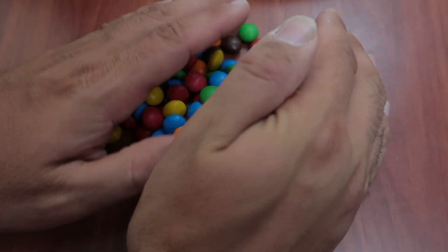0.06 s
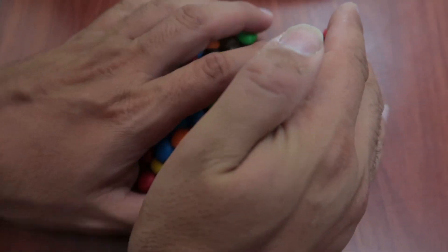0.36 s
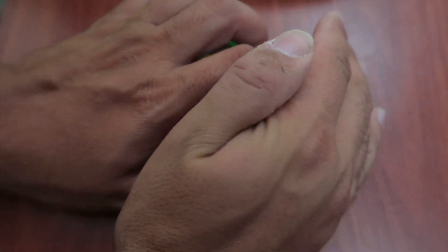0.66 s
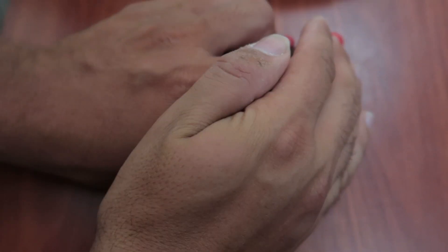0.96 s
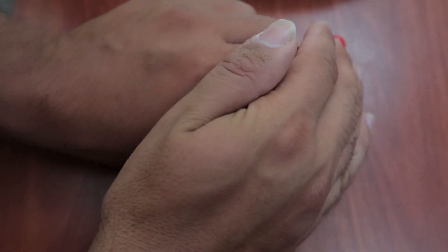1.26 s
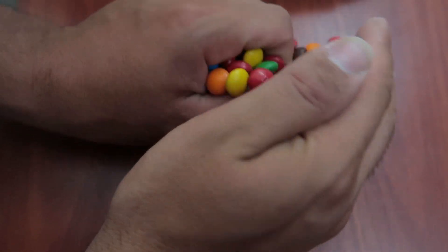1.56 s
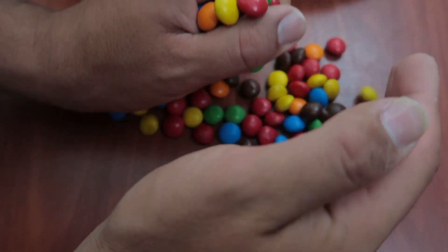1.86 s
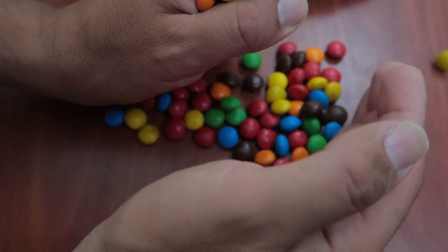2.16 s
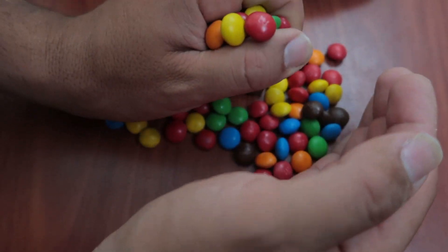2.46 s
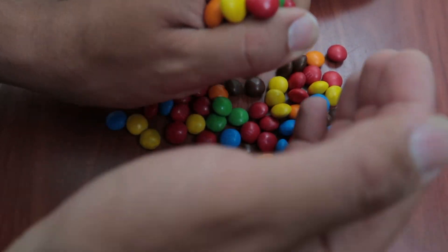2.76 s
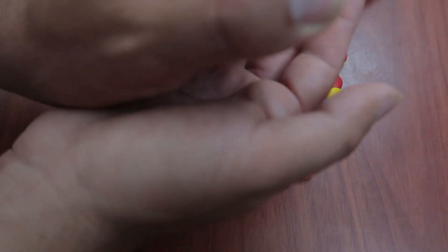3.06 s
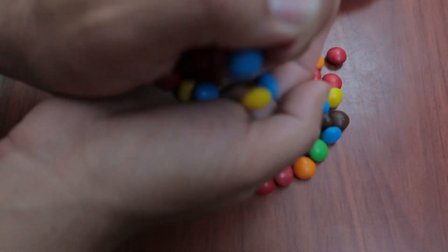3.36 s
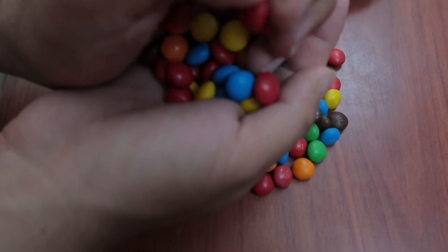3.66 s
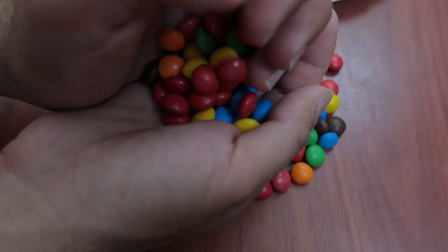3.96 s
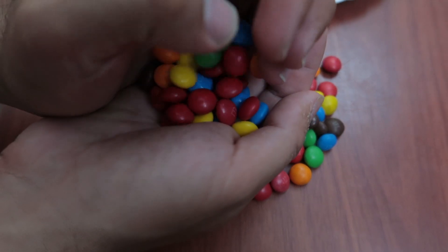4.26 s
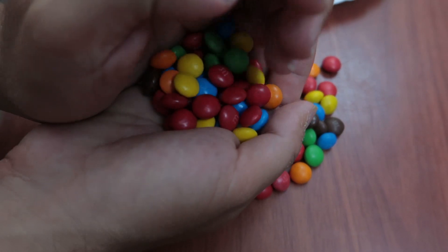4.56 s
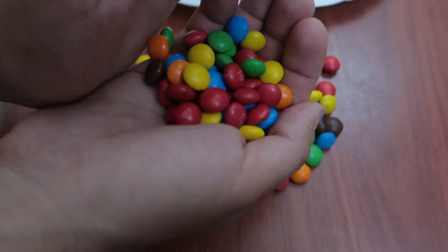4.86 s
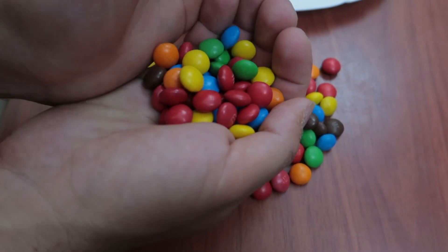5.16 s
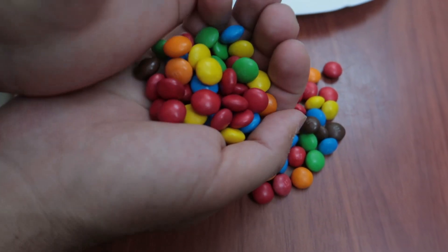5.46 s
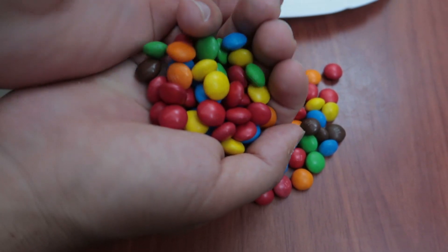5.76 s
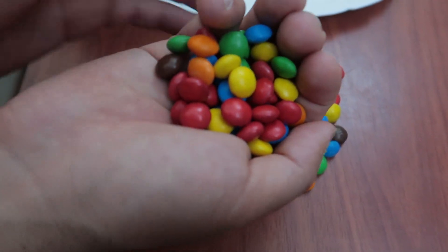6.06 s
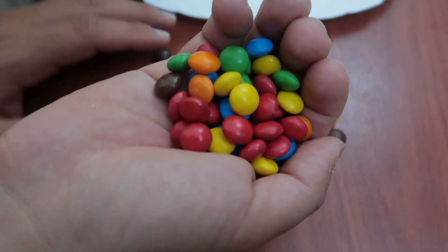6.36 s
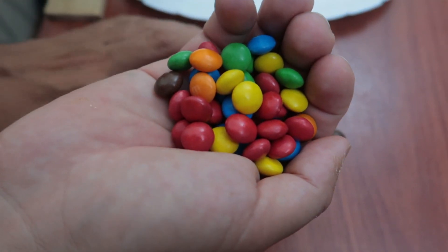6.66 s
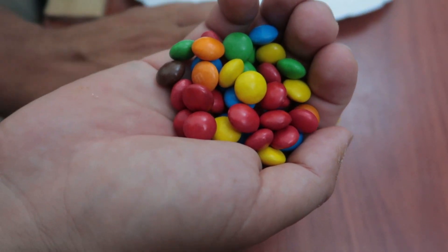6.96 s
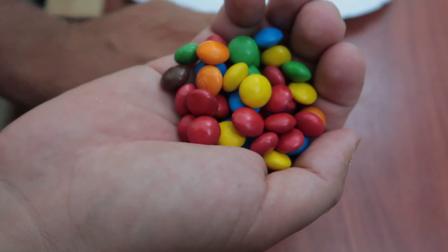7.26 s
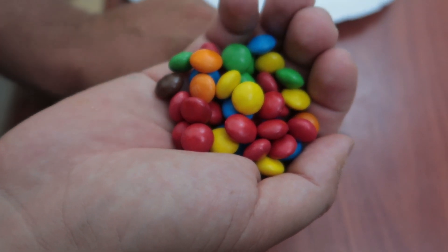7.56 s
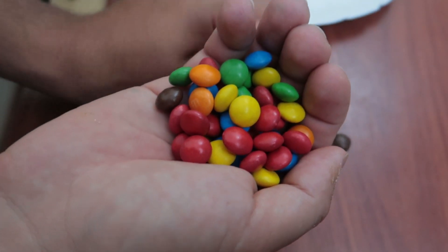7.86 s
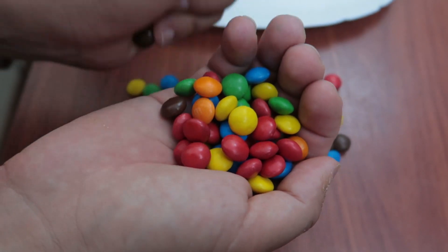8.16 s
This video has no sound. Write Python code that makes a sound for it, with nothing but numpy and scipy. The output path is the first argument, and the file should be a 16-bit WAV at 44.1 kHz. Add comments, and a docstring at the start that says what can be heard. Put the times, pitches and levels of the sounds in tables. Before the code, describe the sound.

Small hard candies clatter and scrape across a wooden tabletop as hands gather them, with a slight room echo. Some drop and bounce sharply, followed by duller, more distant taps. Close to the microphone, the candies trickle from one hand into the other, shell clicking on shell, then settle with sparse ticks and soft skin rubs. A second, shorter clattering sweep ends it. Quiet room air and a low hum continue throughout.

```python
"""Two hands sweep sugar-shelled candies together on a wooden table: the shells scrape and clatter,
and the board and the room ring. Just after 2 s a few fall and bounce, and strays tap farther off.
From 3.4 s the handful pours from palm to palm, shell clicking on shell, dry, bright and close.
At 7 s the hands sweep up the rest. A low hum and room air lie under it all."""
import sys
import numpy as np
from scipy import signal
from scipy.fft import rfft, irfft, next_fast_len
from scipy.io import wavfile
from scipy.ndimage import uniform_filter1d

SR = 44100
rng = np.random.default_rng(int(sys.argv[2]) if len(sys.argv) > 2 else 0)


def inscribe(sig):
    """Save sig as 16-bit PCM at rate SR to the path in sys.argv[1].

    A 1-D sig is mono; a 2-D sig holds one channel per row.
    Samples are clipped to [-1, 1] before scaling.
    """
    pcm = np.round(np.clip(np.atleast_2d(sig).T, -1, 1) * 32767)
    wavfile.write(sys.argv[1], SR, pcm.astype(np.int16))


N = 362061
TIME = np.arange(N) / SR
CUTOFF_HZ = 15900
STROKE_SWELL_DB, SPILL_SWELL_DB, TOUCH_SWELL_DB = 6, 22, 9

# Candies hitting the table. Each row: start in seconds, relative level in dB, tilt in dB per octave.
KNOCKS = [(0.0138, -27, 2), (0.0281, -31, 3), (0.1415, -36, -18), (0.3056, -40, -7.0), (0.3956, -31.5, 1.5),
          (0.4292, -29.5, -4), (0.4694, -31.5, -1.5), (0.5002, -29.5, -3), (0.5095, -35, 0),
          (0.5325, -19, -0.5), (0.5898, -36, 0), (0.6226, -20.5, 0), (0.685, -21.5, -3),
          (0.6901, -20.5, -2.5), (0.7205, -30, -1), (0.7515, -27, 0), (0.7879, -24, -2.5),
          (0.8602, -29, -3), (0.868, -21, -3.5), (0.875, -22.5, -3.5), (0.9235, -22.5, -1.5),
          (0.9545, -25, -0.5), (0.9893, -23, -2), (1.0058, -16.5, -2.5), (1.0235, -15, -2),
          (1.029, -20.5, 0), (1.039, -29, -1), (1.0904, -24.5, -2.5), (1.116, -30, -11),
          (1.1469, -20, -2.5), (1.2163, -25.5, -12), (1.2617, -31, 0), (1.2962, -24.5, -3),
          (1.354, -27.5, -10), (1.3599, -25, -7), (1.4041, -21, -4), (1.4204, -21.5, -2.5),
          (1.4768, -17, -1), (1.5032, -18.5, -2.5), (1.5388, -17.5, -3), (1.554, -22, -2.5),
          (1.5861, -22.5, -1.5), (1.6269, -12, -4.5), (1.6565, -23, 0), (1.6615, -24, 3), (1.6696, -10, 0),
          (1.6875, -21, -2), (1.7171, -15, 1), (1.7335, -24, 2), (1.7415, -20, -2), (1.758, -21, 3),
          (1.7685, -19, -2), (1.774, -13, -1), (1.7905, -32, -2), (1.8165, -19, 0.5), (1.8395, -25, 10),
          (1.8652, -15.5, -1), (1.8948, -20, 1), (1.9115, -14.5, 3), (1.9226, -12, -0.5),
          (1.9542, -14.5, 7), (1.9733, -16.5, -1), (6.9871, -34, -3.5), (7.0178, -31, 0),
          (7.0812, -28, -4.5), (7.1217, -26.5, -8), (7.1406, -16, -0.5), (7.176, -19, -8),
          (7.1862, -20, 2.5), (7.2322, -22.5, 2), (7.2688, -19, -3), (7.2929, -19, -2), (7.316, -22, -2),
          (7.3598, -24, -2), (7.3905, -25.5, -1), (7.4155, -27.5, 1), (7.4345, -23.5, -2),
          (7.479, -26.5, -2), (7.576, -32, -1.5), (7.6415, -27, -1), (7.645, -11.5, 0.5), (7.7976, -20, -1),
          (7.821, -25, -2), (7.881, -25, -4.5), (7.9038, -15.5, -3.5), (7.934, -23, 0), (7.9563, -24, -2),
          (7.9979, -17.5, -2), (8.0216, -22, -9), (8.0387, -16.5, -1), (8.0708, -17, -3.5),
          (8.0995, -19, -1.5), (8.1183, -23.5, 0)]
# Each row: frequency in Hz, gain in dB.
KNOCK_SPECTRUM = [(100, -24.5), (200, -13), (280, -4.5), (540, -9.5), (920, 2.5), (1060, 0.5), (1200, -1.5),
                  (1550, -0.5), (2000, -2), (2450, 1), (3000, 1), (3750, 4), (5200, -3), (7200, -9.5),
                  (9200, -23.5), (12500, -27.5), (16000, -53.5)]
# Each row: frequency in Hz, left-right likeness from 0 to 1.
KNOCK_LIKENESS = [(300, .998), (1000, .99), (1400, .95), (3100, .87), (6800, .65), (14000, .45)]


def knocking(clack_db=19, thud_db=4.5):
    """Candies tip over, hit the wood and nudge their neighbours. Returns clacks and thuds."""
    movement = swells(STROKES, STROKE_SWELL_DB)
    tumbles = scattered(movement, per_s=36, over_db=0, spread_db=2.5, tilt_db=-6.5, tilt_spread_db=1.5)
    knocks = [*KNOCKS, *tumbles]
    clacks = blows(knocks, KNOCK_SPECTRUM, KNOCK_LIKENESS, crack, tilt_top_hz=6440, top_hz=7983,
                   width_hz=447, stages=11, rebound_s=.0025, rebound_db=-5.5,
                   chatter_db=-1.5, chatter_t60_s=.023)
    return from_db(clack_db) * clacks, thudding([(s, db + thud_db) for s, db, _ in knocks])


# Hand strokes pushing the heap. Each row: start, rise, hold and release T60 in seconds,
# relative scrape and rattle levels in dB.
STROKES = [(0.0, 0.0045, 0.028, 0.26, -34.5, -69), (.11, 0.028, 0.013, 0.28, -42, -72),
           (.4, 0.0089, 0.2, .3, -56, -46), (.59, 0.027, 0.36, 0.51, -33.5, -47),
           (.82, 0.056, 0.025, 0.23, -28.5, -29), (1.0, 0.022, 0.021, 0.31, -33, -33),
           (1.06, .02, .03, 2.2, -36, -37.5), (1.135, 0.0036, 0.011, 0.1, -30, -35.5),
           (1.35, 0.053, 0.29, 0.54, -35.5, -64), (1.62, 0.058, 0.35, 0.27, -30.5, -29),
           (2.18, 0.072, 0.043, 0.2, -34, -47), (6.98, 0.15, 0.32, 0.63, -34.5, -40),
           (7.29, 0.014, 0.032, .2, -36, -37), (7.62, 0.037, 0.14, 0.51, -37.5, -43),
           (7.88, 0.052, 0.069, 0.33, -34, -43)]
# Each row: frequency in Hz, gain in dB.
SCRAPE_SPECTRUM = [(70, -16.5), (125, -10), (168, 3.5), (205, -18.5), (250, 4.5), (330, -4), (548, -9.5),
                   (950, -4), (1750, -7), (2400, -8), (3800, -13.5), (5000, -16.5), (8000, -35),
                   (14000, -65)]
RATTLE_SPECTRUM = [(1500, -6.5), (3500, 7.5), (5200, -8), (7000, -6), (8300, -11), (9500, -15.5),
                   (14000, -30)]
# Each row: frequency in Hz, left-right likeness from 0 to 1.
TABLE_LIKENESS = [(300, .995), (1000, .99), (1400, .96), (3100, .84), (6800, .4), (14000, 0)]


def scraping(jerk_db=2.5, scrape_db=-6.5, rattle_db=-5):
    """Shells catch and slip on the wood grain and jostle each other, in uneven jerks."""
    slips = grains(per_s=850, spread_db=3.8, t60_s=.006)
    jostles = grains(per_s=600, spread_db=2.5, t60_s=.01)
    scrape = texture(slips, SCRAPE_SPECTRUM, TABLE_LIKENESS) * swells(STROKES, STROKE_SWELL_DB)
    rattle = texture(jostles, RATTLE_SPECTRUM, TABLE_LIKENESS)
    rattle *= swells(STROKES, STROKE_SWELL_DB, level_column=5)
    jerks = from_db(jerk_db * drift(per_s=70))
    return jerks * (from_db(scrape_db) * scrape + from_db(rattle_db) * rattle)


# Distinct shell clicks. Each row: start in seconds, relative level in dB, tilt in dB per octave,
# pitch in Hz.
CLICKS = [(0.3965, -38, -1, 11500), (0.432, -45, 3, 11500), (0.5325, -24, -8.5, 6000),
          (0.722, -42, 3, 12000), (0.772, -37, 4, 11000), (1.0235, -29, 0, 9000), (1.205, -34.5, -2, 12000),
          (2.1744, -13, -3.5, 5100), (2.1817, -35, 20, 13000), (2.2305, -22.5, 0, 12500),
          (2.2945, -33, 4, 12500), (2.3035, -38, 8, 12500), (2.4781, -33.5, -10, 3740),
          (2.593, -42, -7, 3700.0), (2.8246, -51, -2, 7020), (3.1867, -42.5, -5.5, 2500),
          (3.4027, -31, -1, 8150), (3.4187, -29.5, -2.5, 6300), (3.4256, -36, -2, 6160),
          (3.4444, -21.5, 4.5, 11800.0), (3.451, -31.5, -9, 11100.0), (3.4699, -36, -10, 11100.0),
          (3.4759, -31, 5, 8800.0), (3.483, -30, 6.0, 10500.0), (3.5, -36, 9, 11100.0),
          (3.5094, -23.5, 4, 8300.0), (3.5231, -22, 6, 4370), (3.5322, -23, 11, 3930),
          (3.5954, -22.5, 8, 8800.0), (3.6085, -20, 9, 9100), (3.615, -27, 6, 3100.0),
          (3.6222, -28, 7, 6600.0), (3.6372, -23, 9, 7400.0), (3.6418, -25.0, 12, 10840),
          (3.6543, -33, -1, 7230), (3.6593, -22, 6, 13200.0), (3.6673, -25, 1, 8800.0),
          (3.6734, -22, -0.5, 10500.0), (3.6842, -29, -4, 13100), (3.7094, -30, -3, 8800.0),
          (3.719, -17.5, 2.5, 4660), (3.7308, -20.5, -0.5, 7850), (3.7528, -29, 0, 14000.0),
          (3.7576, -31, 0.5, 4900.0), (3.7745, -28, -3, 8800.0), (3.8005, -27, 4.0, 5140),
          (3.8274, -25, 2.5, 2600.0), (3.8356, -23, 27, 8800.0), (3.8414, -37, 5, 12500.0),
          (3.8507, -34, 2, 11800.0), (3.8749, -17, 2, 14000.0), (3.8834, -39, 10, 11050),
          (3.8974, -18.5, -0.5, 13200.0), (3.9029, -18, 9, 13200.0), (3.91, -25, -2, 8800.0),
          (3.9152, -35, 7, 11100.0), (3.9373, -24, 0, 11100.0), (3.9452, -16, 0.5, 4600.0),
          (3.9579, -19, 4, 3670), (3.9763, -23, 1.5, 2580), (3.9907, -25, 3, 4400.0),
          (4.004, -34.5, 6, 8800.0), (4.0184, -28, 4, 3900.0), (4.0242, -24.5, 0.5, 8800.0),
          (4.0564, -25.5, -0.5, 10040), (4.114, -31, -1, 11020), (4.1373, -31, 13, 2600.0),
          (4.1439, -22, -3, 8550), (4.16, -34.0, -1, 9900.0), (4.2077, -26.5, -1.5, 4400.0),
          (4.2282, -28, 2, 2600.0), (4.2502, -25, 1, 11800.0), (4.258, -21.5, -1.5, 9900.0),
          (4.2687, -19, 2, 11100.0), (4.2753, -29, 3, 11100.0), (4.2998, -26, 1, 10500.0),
          (4.3064, -33.5, 1, 4107), (4.3212, -27, 1, 7780), (4.3281, -19, 1, 5140),
          (4.3519, -17.0, 0.5, 4600.0), (4.367, -17, 1.5, 4840), (4.3979, -32, -2, 6970),
          (4.421, -25.0, 2, 7400.0), (4.4536, -43.5, 0.0, 7800.0), (4.4625, -30.5, 1.5, 8300.0),
          (4.4772, -37, 1, 4100.0), (4.4817, -26.5, -0.5, 12400), (4.49, -40, -0.5, 11800.0),
          (4.4989, -49, 2, 4400.0), (4.515, -36, -2, 7800.0), (4.522, -38.0, -3, 5900.0),
          (4.5475, -31.5, -0.5, 8430), (4.6198, -30, -2, 11100.0), (4.6295, -41, -3, 7000.0),
          (4.6455, -28.5, 7, 2900.0), (4.6592, -39.0, 1.5, 8820), (4.6968, -42.0, -2, 12500.0),
          (4.7142, -31, 2, 3500.0), (4.7363, -45.5, -1, 9900.0), (4.8779, -49, -2, 4900.0),
          (5.1376, -44.5, -3, 4130), (5.2124, -52, -4, 7400.0), (5.2201, -36, 1.5, 7800.0),
          (5.2923, -44, -3, 5190), (5.2995, -47, 0.5, 5530), (5.3041, -50.5, -1.0, 4400.0),
          (5.3391, -35.5, -3.5, 8800.0), (5.347, -37, 2.0, 11760), (5.3529, -48, -2, 8280),
          (5.3829, -38, 5, 3500.0), (5.4027, -35.5, 2, 3930), (5.4105, -41.5, -3, 11100.0),
          (5.441, -52, -3, 3900.0), (5.4576, -46.0, -4.0, 3700.0), (5.4662, -44, -4, 4400.0),
          (5.4762, -45.5, -3, 5200.0), (5.4905, -47, -6, 7800.0), (5.5041, -48, -3, 3700.0),
          (5.7121, -40, -2, 7000.0), (5.8955, -39.5, -3, 8300.0), (5.9158, -47.5, -2, 3920),
          (6.1242, -35.5, -1.5, 11180), (6.1439, -48, -1, 8800.0), (6.351, -51.5, -1.5, 6030),
          (6.6537, -39.5, 2, 4660), (6.983, -43, 0, 11100), (7.0178, -34, -6, 11400),
          (7.122, -40, 1, 12000), (7.6455, -16.5, -6, 6300)]
# Each row: frequency in Hz, gain in dB.
SHELL_SPECTRUM = [(600, -29), (1000, -18), (1400, -4), (1750, -13.5), (2250, -7), (2700, 1), (3400, -5),
                  (4600, -2), (7500, -3), (9800, -4), (12200, -3), (14000, -10), (16000, -21)]
# Each row: frequency in Hz, left-right likeness from 0 to 1.
PALM_LIKENESS = [(1400, 1), (3100, 1), (6800, 0.83), (15000, 0.43)]


def clicking(gain_db=20, pitch_range_hz=(2600, 13500)):
    """Shell hits shell: short clicks, each with its own pitch, coloured by the cupped hands."""
    movement = swells(SPILLS, SPILL_SWELL_DB)
    jostles = scattered(movement, per_s=45, over_db=2, spread_db=6, tilt_db=-1, tilt_spread_db=2)
    pitches_hz = np.exp(rng.uniform(*np.log(pitch_range_hz), len(jostles)))
    rows = [*CLICKS, *np.c_[jostles, pitches_hz]]
    clicks = blows(rows, SHELL_SPECTRUM, PALM_LIKENESS, crack, ring_db=6.5, ring_q=6.7, top_hz=15440,
                   width_hz=1370, stages=6, rebound_s=.0005, rebound_db=-5,
                   chatter_db=-4, chatter_t60_s=.063)
    return from_db(gain_db) * clicks


# Candies spilling, then settling. Each row: start, rise, hold and release T60 in seconds, level in dB.
SPILLS = [(3.42, 0.13, 0.03, 0.38, -27), (3.82, 0.01, 0.011, 0.082, -30), (3.89, 0.014, 0.056, 0.36, -34),
          (4.135, 0.0075, .01, 0.14, -40.5), (4.245, 0.011, 0.0062, 0.2, -27),
          (4.32, 0.03, 0.038, 0.15, -44), (4.46, 0.016, .015, 0.18, -48), (4.63, 0.012, 0.012, 0.23, -43),
          (5.12, 0.023, 0.033, 0.28, -62), (5.28, 0.03, 0.023, 0.11, -56), (5.33, 0.011, 0.0061, 0.14, -45),
          (5.38, .015, .02, 0.64, -58), (5.91, 0.08, .03, 0.26, -64)]


def pouring():
    """Countless light touches rustle as the handful slides from palm to palm."""
    touches = grains(per_s=1000, spread_db=3.5, t60_s=.004)
    return texture(touches, SHELL_SPECTRUM, PALM_LIKENESS) * swells(SPILLS, SPILL_SWELL_DB)


# Falls and bounces. Each row: start in seconds, relative level in dB, tilt in dB per octave, thud in dB.
DROPS = [(2.1741, -8.5, 0.5, -2), (2.188, -24, -1, -17), (2.2218, -22, 0.5, -16), (2.231, -13, 2.5, -6),
         (2.2948, -20.5, 2.5, -15), (4.788, -28, -1.5, -11), (4.802, -33.5, -3, -32)]
# Each row: frequency in Hz, gain in dB.
DROP_SPECTRUM = [(100, -31), (280, -6.5), (540, -3), (920, 3.5), (1300, -4), (2400, -0.5), (3750, 2),
                 (5200, 0), (7200, -8.5), (9200, -23), (12500, -34), (16000, -50)]


def dropping(crack_db=20):
    """Falling candies crack on the bare wood and make it thump. Returns cracks and thuds."""
    cracks = blows([row[:3] for row in DROPS], DROP_SPECTRUM, KNOCK_LIKENESS, crack, tilt_top_hz=6400,
                   top_hz=8030, width_hz=390, stages=11, rebound_s=.001, rebound_db=-6,
                   chatter_db=-6.5, chatter_t60_s=.021)
    return from_db(crack_db) * cracks, thudding([(s, db) for s, _, _, db in DROPS])


# Each row: frequency in Hz, gain in dB.
THUD_SPECTRUM = [(60, -31), (150, -13), (200, -14), (246, 3.5), (310, -4.5), (380, -15), (500, -14),
                 (1000, -36.5), (4000, -69)]


def thudding(rows):
    """Each blow gives the board a short, low push."""
    pushes = np.zeros((1, N))
    for start_s, db in rows:
        add(pushes, start_s, from_db([[db]]))
    thud = unit_energy(colour(signal.unit_impulse(2048)[None], THUD_SPECTRUM))
    return signal.fftconvolve(pushes, thud, axes=1)[:, :N]


# Taps of stray candies. Each row: start in seconds, relative level in dB.
STRAYS = [(2.407, -25.5), (2.511, -30), (2.613, -26.5), (2.639, -29.5), (2.733, -33.5), (2.742, -27.5),
          (2.823, -33), (2.874, -32), (2.928, -20), (2.992, -26.5), (3.063, -26), (3.12, -33),
          (6.653, -39.5), (6.679, -44.5), (6.933, -40.5)]
# Each row: frequency in Hz, gain in dB.
STRAY_SPECTRUM = [(120, -17), (280, -5), (550, -2.5), (950, -1), (1300, -3.5), (2000, -2.5), (2700, -5.5),
                  (3700, -4), (4500, -9.5), (6000, -15.5), (8000, -31), (16000, -51.5)]


def stray_tapping(gain_db=13, clink_hz=3700, clink_spread=.14):
    """Candies farther off give dull knocks with a blurred attack, each with a faint clink."""
    clinks_hz = clink_hz * np.exp(clink_spread * rng.uniform(-1, 1, len(STRAYS)))
    taps = [(s, db, 0, hz) for (s, db), hz in zip(STRAYS, clinks_hz)]
    return from_db(gain_db) * blows(taps, STRAY_SPECTRUM, TABLE_LIKENESS, burst, ring_q=9,
                                    rise_s=.002, t60_s=.045, chatter_db=-25, chatter_t60_s=.06)


# Hiss of rubbing, one curve per sweep. Each point: time in seconds, level in dB.
RUB_CURVES = [
    [(0.38, -74), (0.452, -66), (0.578, -48), (0.626, -52), (0.714, -47.5), (0.936, -46), (1.028, -46),
     (1.198, -50), (1.338, -57), (1.508, -56), (1.8, -54), (1.872, -59), (2.008, -64), (2.12, -66)],
    [(6.92, -71), (7.036, -58), (7.162, -47), (7.222, -49), (7.322, -48), (7.446, -56), (7.768, -58),
     (7.924, -73), (8.084, -74), (8.2, -70)],
]
# Each row: frequency in Hz, gain in dB.
RUB_SPECTRUM = [(2000, -33.5), (5000, -40.5), (8000, 1), (12000, 1), (14000, -10), (16000, -31)]


def rubbing():
    """Shells rub on each other and on the skin as the heap is squeezed."""
    ticks = grains(per_s=650, spread_db=3.6, t60_s=.006)
    curves_db = [np.interp(TIME, *np.transpose(c), left=-np.inf, right=-np.inf) for c in RUB_CURVES]
    return texture(ticks, RUB_SPECTRUM, TABLE_LIKENESS) * from_db(curves_db).sum(axis=0)


# Skin on varnish or skin. Each row: start, rise, hold and release T60 in seconds, relative level in dB.
BRUSHES = [(.135, 0.0086, 0.0046, 0.067, -58), (.386, 0.0094, .015, 0.55, -39),
           (5.3, 0.026, 0.22, 1, -61.5), (5.75, 0.09, 0.17, .6, -60.5), (6.645, 0.0047, 0.02, .08, -46),
           (6.925, 0.0076, 0.0049, 0.21, -43)]
# Each row: frequency in Hz, gain in dB.
SKIN_SPECTRUM = [(400, -7.5), (750, -7), (1300, -1.5), (1680, -2), (2000, -11), (2500, -13), (3500, -18),
                 (5000, -22), (10000, -32)]


def brushing(gain_db=-1):
    """Skin sticks and slips with a soft rub."""
    slips = grains(per_s=710, spread_db=1, t60_s=.0094)
    rub = texture(slips, SKIN_SPECTRUM, TABLE_LIKENESS)
    return from_db(gain_db) * rub * swells(BRUSHES, TOUCH_SWELL_DB)


# Hand against hand. Each row: start in seconds, relative level in dB.
BUMPS = [(4.17, -25.5), (5.475, -31.5), (6.162, -36.5)]
# Each row: frequency in Hz, gain in dB.
FLESH_SPECTRUM = [(60, 9), (150, 7), (350, 3.5), (650, -10), (1100, 4), (1900, -9), (3500, -6.5),
                  (9000, -31)]


def bumping(gain_db=14):
    """The hands meet with a dull pat."""
    return from_db(gain_db) * blows(BUMPS, FLESH_SPECTRUM, TABLE_LIKENESS, burst,
                                    rise_s=.0007, t60_s=.013, chatter_db=-43, chatter_t60_s=.05)


# Drags of the hand. Each row: start, rise, hold and release T60 in seconds, relative level in dB.
DRAGS = [(.65, 0.059, 0.11, 0.27, -37.5), (.9, 0.023, 0.15, 1.2, -45), (1.39, .03, .1, .5, -46)]
# Each row: frequency in Hz, gain in dB.
RUMBLE_SPECTRUM = [(20, -29), (45, 1), (85, 7.5), (130, -4), (260, -2.5), (1000, -53.5)]


def dragging(gain_db=-2):
    """The heel of the hand judders over the board and makes it rumble."""
    rumble = unit_rms(colour(rng.standard_normal((1, N)), RUMBLE_SPECTRUM))
    return from_db(gain_db) * rumble * swells(DRAGS, TOUCH_SWELL_DB)


# Each row: frequency in Hz, gain at resonance in dB, T60 in seconds.
BOARD_MODES = [(173, 5, .35), (241, 16, .42), (258, 5, .25), (312, 19, .55), (342, 7, .3), (381, 10, .4),
               (442, 4, .35), (512, 6, .35)]


def board(force):
    """The table top rings on in its low modes."""
    age = TIME[:SR // 2]
    hz, db, t60_s = np.array(BOARD_MODES).T[:, :, None]
    unity_peak = 2 * np.log(1000) / (t60_s * SR)
    modes = unity_peak * from_db(db - 60 * age / t60_s) * np.cos(2 * np.pi * hz * age)
    return signal.fftconvolve(force, modes.sum(axis=0)[None], axes=1)[:, :N]


# Peaks and hollows of the table top. Each row: centre in Hz, gain in dB, width in Hz.
RADIATION_BANDS = [(564, -3, 46), (882, 3.5, 68), (1048, 4, 79), (1220, 3, 41), (1310, -0.5, 80),
                   (1514, 1, 31), (1787, -1, 140), (2004, 5.5, 77), (2340, 6, 88), (2550, 4, 35),
                   (2710, 5, 60), (2860, 4.5, 28), (3070, 5.5, 98), (3250, -3.5, 250), (3550, 1.5, 80),
                   (3846, 2.5, 190), (4655, 3, 95), (5690, -0.5, 170)]


def radiated(x):
    """The table top favours some pitches and swallows others: one peaking filter per band."""
    hz, db, width_hz = np.array(RADIATION_BANDS).T
    gain = from_db(db / 2)
    half_width = np.pi * width_hz / SR
    turn = -2 * np.cos(2 * np.pi * hz / SR)
    sos = np.c_[1 + half_width * gain, turn, 1 - half_width * gain,
                1 + half_width / gain, turn, 1 - half_width / gain]
    return signal.sosfilt(sos / sos[:, 3:4], x + 1e-18)


# Each row: frequency in Hz, gain in dB.
ROOM_SPECTRUM = [(150, -6), (205, -1.5), (260, 6.5), (340, 3), (550, 1), (900, -1.5), (1200, -1.5),
                 (1700, -1), (3500, -2), (6000, -0.5), (10000, 3), (15000, -16.5)]
# Each row: frequency in Hz, T60 in seconds.
ROOM_DECAY = [(150, 0.99), (400, 0.89), (1000, 0.56), (2800, 0.54), (7300, 0.25), (15000, 0.28)]


def room(x, build_s=.002):
    """Dense reflections build up quickly and die sooner in the treble."""
    age, hz = TIME[:SR], np.fft.rfftfreq(SR, 1 / SR)
    white = rfft(rng.standard_normal((2, SR)))
    centres_hz, t60s = np.transpose(ROOM_DECAY)
    tail = 0
    for share, t60_s in zip(np.eye(len(centres_hz)), t60s):
        band = irfft(white * at_hz(np.c_[centres_hz, share], hz), SR)
        tail = tail + band * from_db(-60 * age / t60_s)
    tail = colour(unit_energy(tail * np.minimum(age / build_s, 1)), ROOM_SPECTRUM)
    return signal.fftconvolve(stereo(tail, TABLE_LIKENESS), x.mean(axis=0)[None], axes=1)[:, :N]


# Each row: frequency in Hz, RMS level in dB.
HUM_TONES = [(48.8, -52), (98, -66.5), (149.5, -62), (173, -63)]
# Each row: frequency in Hz, gain in dB.
AIR_SPECTRUM = [(41, -17.5), (70, -10.5), (152, -6), (178, -10.5), (286, -6.5), (422, -9.5), (593, -15.5),
                (635, -9), (695, -11), (1000, -16.5), (2170, -20), (8090, -30.5), (11900, -39.5),
                (14600, -46), (16000, -43)]
# Each row: frequency in Hz, left-right likeness from 0 to 1.
AIR_LIKENESS = [(60, 1), (110, .95), (200, .65), (380, .12), (1300, .1), (2400, 0)]


def background(air_db=-52, waver_rad=.21):
    """Diffuse room air and a slightly wavering hum."""
    air = texture(rng.standard_normal((2, N)), AIR_SPECTRUM, AIR_LIKENESS)
    hum = sum(from_db(db) * np.sqrt(2) * np.sin(2 * np.pi * hz * TIME + waver_rad * drift(per_s=3.7))
              for hz, db in HUM_TONES)
    return from_db(air_db) * air + hum


def blows(rows, spectrum, likeness, strike, tilt_top_hz=14000, ring_db=0, ring_q=1, **shape):
    """Play contacts. Each row: start in seconds, level in dB, optional tilt and ringing pitch."""
    out = np.zeros((2, N))
    for start_s, db, *tone in rows:
        tilt_db = tone[0] if tone else 0
        blow = colour(stereo(strike(**shape), likeness), spectrum, tilt_db, tilt_top_hz, size=1024)
        for hz in tone[1:]:
            resonator = signal.iirpeak(min(hz, CUTOFF_HZ), ring_q, fs=SR)
            blow = blow + from_db(ring_db) * signal.lfilter(*resonator, blow)
        add(out, start_s, from_db(db) * unit_energy(blow))
    return out


def crack(top_hz, width_hz, stages, rebound_s, rebound_db, chatter_db, chatter_t60_s, size=2048):
    """A hard pulse and two quick rebounds, smeared by all-pass stages, with fading chatter."""
    pulse = signal.unit_impulse(size)
    for k, delay_s in enumerate(np.cumsum(rebound_s * rng.uniform(.3, 1.5, 2)), 1):
        pulse[int(delay_s * SR)] += rng.choice([-1, 1]) * from_db(k * rebound_db)
    radius = np.exp(-np.pi * width_hz / SR)
    pair = []
    for centres_hz in rng.uniform(0, top_hz, (2, stages)):
        poles = np.array([[1, -2 * radius * np.cos(2 * np.pi * hz / SR), radius ** 2]
                          for hz in centres_hz])
        pair.append(signal.sosfilt(np.c_[poles[:, ::-1], poles], pulse + 1e-18))
    chatter = unit_energy(rng.standard_normal((2, size)) * from_db(-60 * TIME[:size] / chatter_t60_s))
    return np.array(pair) + from_db(chatter_db) * chatter


def burst(rise_s, t60_s, chatter_db, chatter_t60_s, size=2048):
    """One blow as a noise burst, then the weaker chatter of the neighbours it shakes."""
    age = TIME[:size]
    attack = 1 - np.exp(-age / rise_s)
    decay = from_db(-60 * age / t60_s) + from_db(chatter_db - 60 * age / chatter_t60_s)
    return rng.standard_normal((2, size)) * attack * decay


def scattered(movement, per_s, over_db, spread_db, tilt_db, tilt_spread_db, count=600, floor_db=-62):
    """Rows for blows(): contacts at uneven gaps, as strong as the movement."""
    starts_s = np.cumsum(rng.gamma(2, .5, count)) / per_s
    force, hardness = rng.uniform(-1, 1, (count, 2)).T
    movement_db = 20 * np.log10(np.maximum(np.interp(starts_s, TIME, movement, right=0), 1e-9))
    levels_db = movement_db + over_db + spread_db * force
    return np.c_[starts_s, levels_db, tilt_db + tilt_spread_db * hardness][movement_db > floor_db]


def grains(per_s, spread_db, t60_s):
    """Tiny noise bursts at random moments, many weak and a few strong."""
    born = rng.random(N) < per_s / SR
    sizes = born * from_db(spread_db * np.minimum(rng.exponential(1, N), 3))
    power = signal.lfilter([1], [1, -from_db(-60 / (t60_s * SR)) ** 2], sizes ** 2 + 1e-12)
    return np.sqrt(power) * rng.standard_normal((2, N))


def swells(rows, swell_db, level_column=4):
    """Gain of a run of gestures: each rises by swell_db, holds and dies away."""
    rows, coarse_s = np.array(rows), TIME[::40]
    start, rise, hold, t60 = rows.T[:4, :, None]
    age = coarse_s - start
    shape_db = -swell_db * np.clip(1 - age / rise, 0, 1) - 60 * np.clip((age - rise - hold) / t60, 0, 2)
    gain = np.max((age >= 0) * from_db(rows[:, level_column, None] + shape_db), axis=0)
    return uniform_filter1d(np.interp(TIME, coarse_s, gain), size=200)


def drift(per_s):
    """Random wander of unit RMS."""
    knots = rng.standard_normal(int(N / SR * per_s) + 2)
    return unit_rms(np.interp(TIME * per_s, np.arange(len(knots)), knots))


def texture(pair, spectrum, likeness):
    """A noise pair as coloured stereo of unit RMS."""
    return unit_rms(colour(stereo(pair, likeness), spectrum))


def colour(x, spectrum, tilt_db=0, tilt_top_hz=16000, size=4096):
    """Minimum-phase filter with this spectrum, tilted by tilt_db per octave above 1 kHz."""
    hz = np.fft.rfftfreq(size, 1 / SR)
    octaves = np.log2(np.clip(hz, 1000, tilt_top_hz) / 1000)
    cepstrum = irfft(np.log(from_db(at_hz(spectrum, hz) + tilt_db * octaves)))
    cepstrum[1:size // 2] *= 2
    cepstrum[size // 2 + 1:] = 0
    impulse = irfft(np.exp(rfft(cepstrum)))
    return signal.fftconvolve(x, impulse[None], axes=1)[:, :x.shape[1]]


def stereo(pair, likeness):
    """Two unrelated signals become left and right, alike in the bass and apart in the treble."""
    size = next_fast_len(pair.shape[1])
    mid, side = rfft(pair, size)
    alike = np.clip(at_hz(likeness, np.fft.rfftfreq(size, 1 / SR)), 0, 1)
    left_right = np.sqrt(1 + alike) * mid + np.sqrt(1 - alike) * side * [[1], [-1]]
    return irfft(left_right, size)[:, :pair.shape[1]]


def at_hz(points, hz):
    """Read a table on a log-frequency axis."""
    points_hz, values = np.transpose(points)
    return np.interp(np.log(np.maximum(hz, 1)), np.log(points_hz), values)


def add(out, start_s, sound):
    start = int(np.clip(round(start_s * SR), 0, N - 1))
    out[:, start:start + sound.shape[1]] += sound[:, :N - start]


def from_db(db):
    return 10 ** (np.asarray(db) / 20)


def unit_rms(x):
    return x / np.sqrt(np.mean(x ** 2) + 1e-20)


def unit_energy(x):
    return x / np.sqrt(np.mean(np.sum(x ** 2, axis=-1)) + 1e-20)


def scene(knock_room_db=-3, drop_room_db=-7, slide_room_db=-7, palm_room_db=-16, stray_room_db=-6,
          thud_ring_db=-9):
    """Knocks and slides echo in the room, each with its own tail; the palms are nearly dry."""
    clacks, knock_thuds = knocking()
    drops, drop_thuds = dropping()
    thuds = knock_thuds + drop_thuds
    slides = scraping() + brushing()
    strays = stray_tapping()
    table = clacks + drops + slides + strays
    palm = clicking() + pouring() + rubbing() + bumping()
    echo = room(from_db(knock_room_db) * clacks + from_db(drop_room_db) * drops)
    echo += room(from_db(slide_room_db) * slides + from_db(palm_room_db) * palm
                 + from_db(stray_room_db) * strays)
    ring = board(table + from_db(thud_ring_db) * thuds)
    return radiated(table + echo) + thuds + ring + palm + dragging() + background()


def record(dry):
    """The loudest peaks clip; a steep low-pass cuts the top."""
    low_pass = signal.ellip(10, .1, 80, CUTOFF_HZ, fs=SR, output="sos")
    return signal.sosfilt(low_pass, np.clip(dry, -.85, .85))


dry = scene()
out = record(dry)
inscribe(out)
```